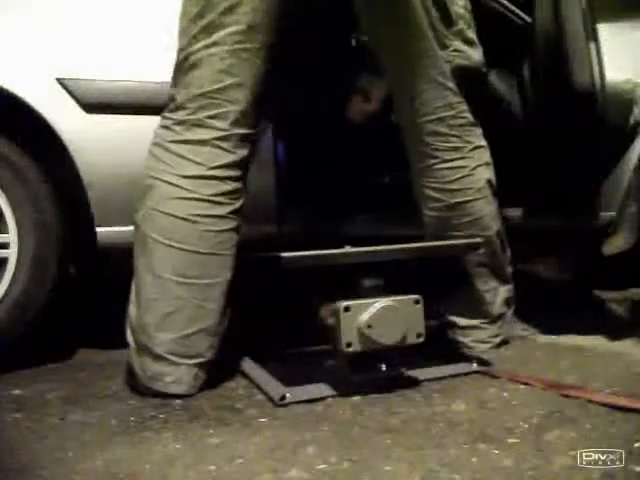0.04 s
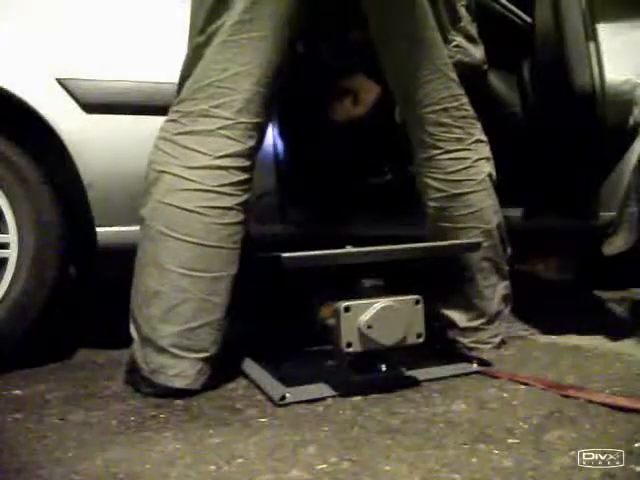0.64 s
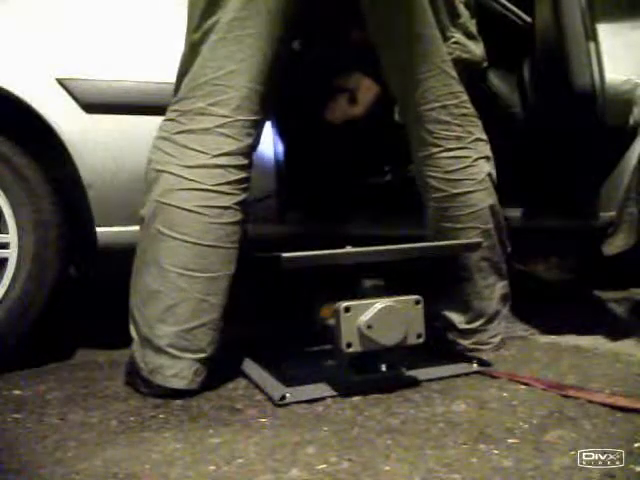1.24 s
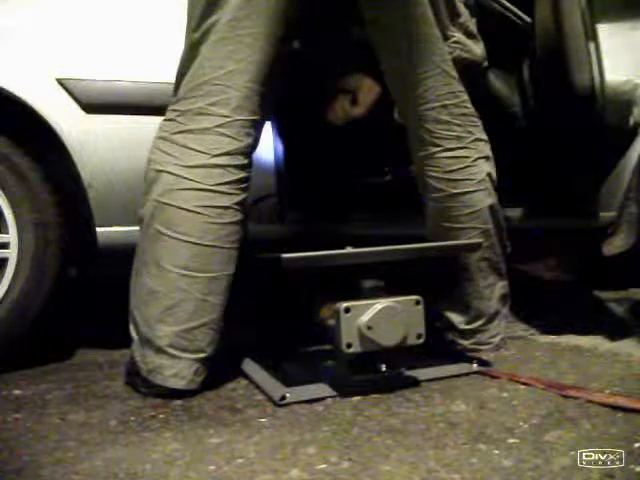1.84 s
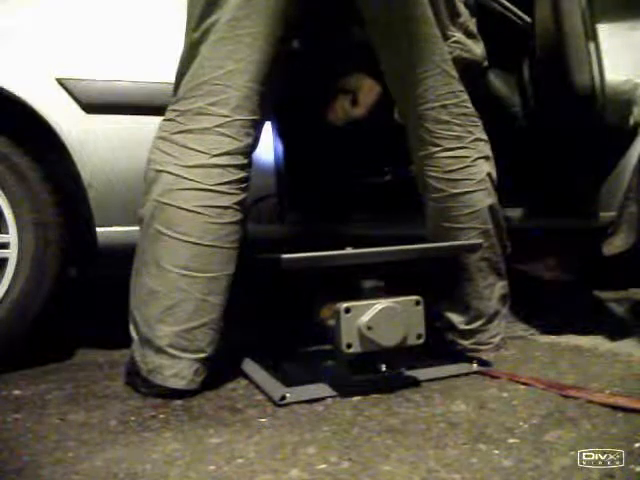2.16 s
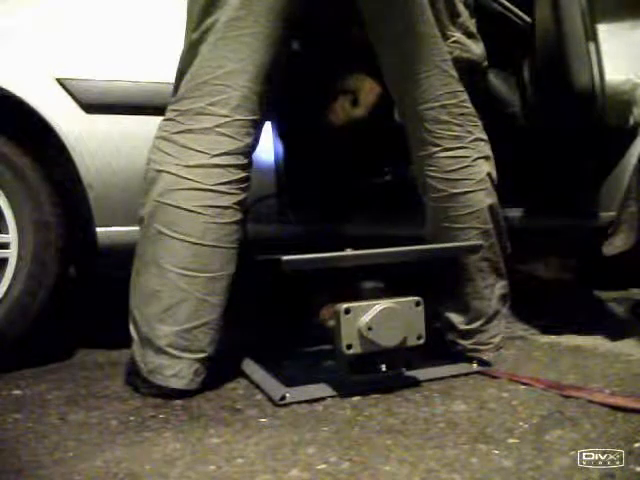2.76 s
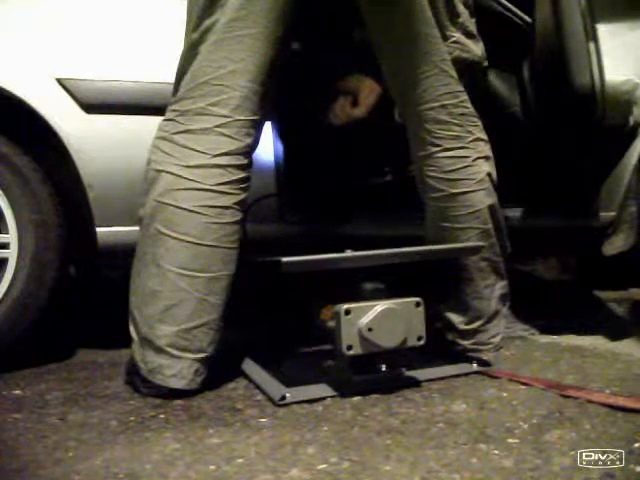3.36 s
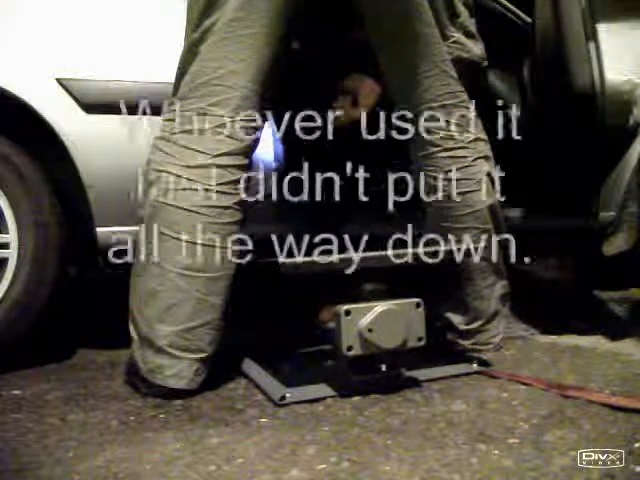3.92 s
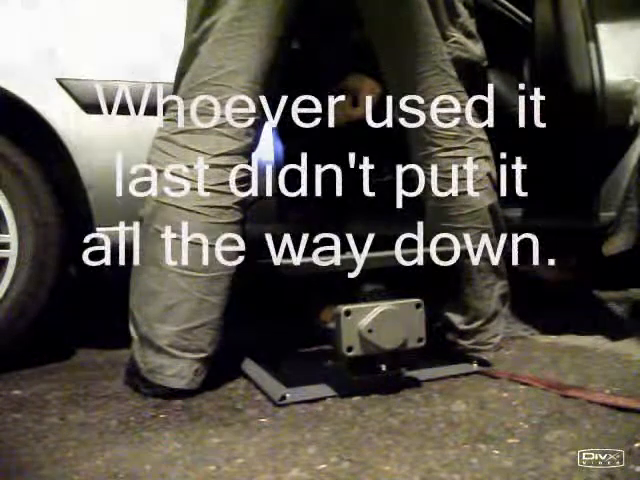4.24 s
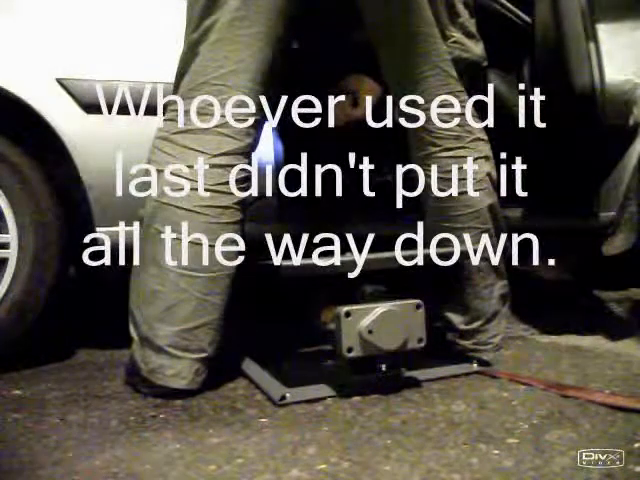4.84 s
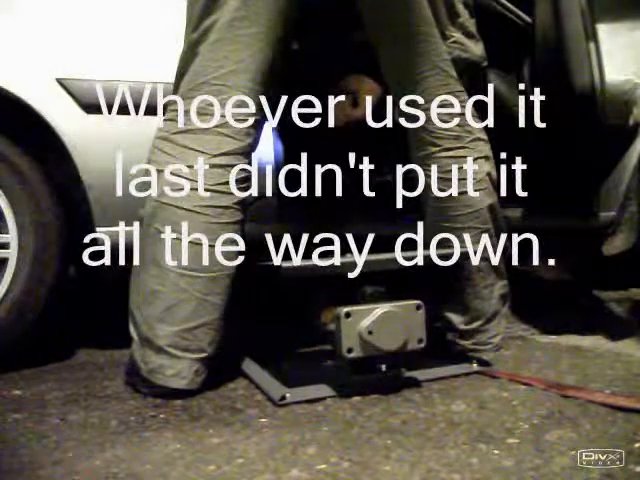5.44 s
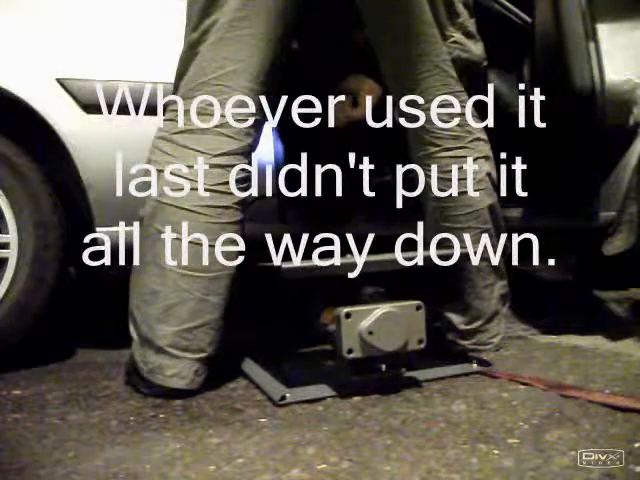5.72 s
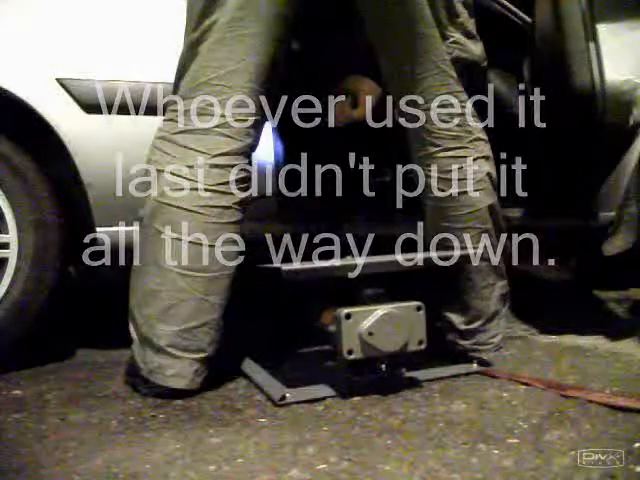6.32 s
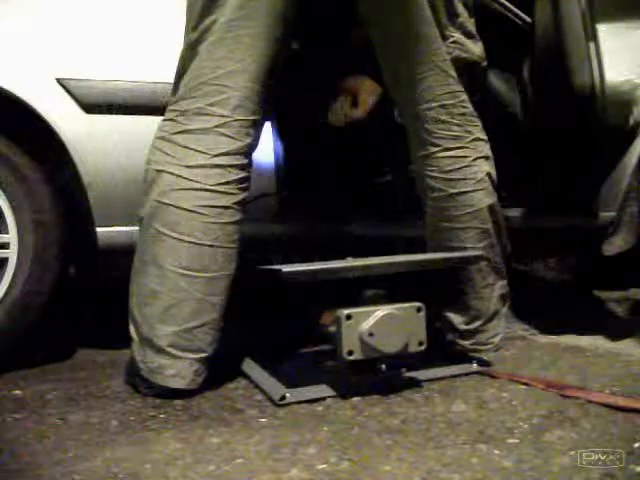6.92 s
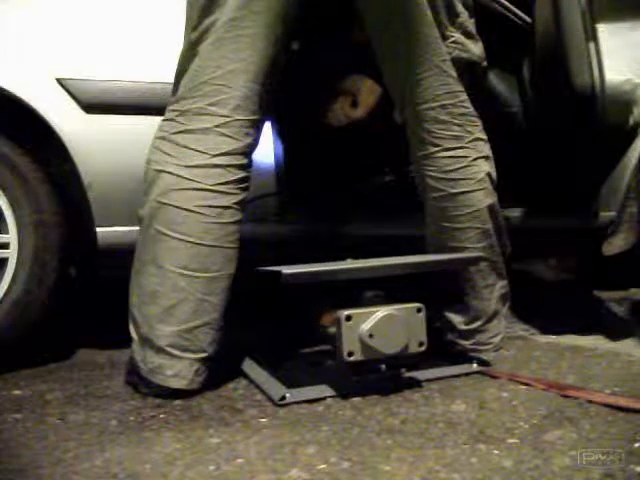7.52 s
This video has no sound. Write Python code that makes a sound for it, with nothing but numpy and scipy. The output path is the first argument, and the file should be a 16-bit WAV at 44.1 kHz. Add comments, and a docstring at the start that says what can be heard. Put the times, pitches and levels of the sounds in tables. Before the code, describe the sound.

An electric car jack is switched on in four quick bursts, its switch snapping and its motor spinning up and coasting down. Loose gears clack sharply as it starts a fifth time, then it runs steadily with a thin whine and a ringing, throbbing metal chatter. It is outdoors beside a car, with soft hiss and a far rumble. A small camera microphone nearby adds a bright fizz.

```python
"""An electric car jack is switched on in four short bursts, then left running beside a car.
Its switch snaps and its motor spins up and whines. Its loose gears clack, then chatter in a ringing
metal housing and throb as the wheels and the lifting screw turn, over a soft hiss and a far rumble.
A small camera samples the sound coarsely, which mirrors the chatter into a bright fizz."""
import sys
import numpy as np
from scipy.fft import rfft, irfft, next_fast_len
from scipy.io import wavfile
from scipy.ndimage import map_coordinates

SR = 44100
rng = np.random.default_rng(int(sys.argv[2]) if len(sys.argv) > 2 else 0)


def transcribe(u):
    """Save the signal u as a 16-bit wav file named by the first command-line argument.

    u: samples, shape (n,) or (channels, n), limited to [-1, 1]; the rate is SR.
    q: integer samples, one column per channel.
    """
    v = np.clip(np.atleast_2d(u).T, -1, 1)
    q = np.round(v * 32767).astype(np.int16)
    wavfile.write(sys.argv[1], SR, q)


N = 334278
TIME = np.arange(N) / SR

# each run of the motor: (switch on [s], switch off [s], relative rattle level [dB])
RUNS = [(-.07, .068, -.5), (.44, .596, .5), (.7164, .858, .5), (1.0266, 1.163, -.6), (1.3663, 9.1, 0)]


def amp(db):
    """Turn decibels into a gain."""
    return 10 ** (np.asarray(db) / 20)


def unit(x):
    """Scale a signal to an average (rms) level of 1."""
    return x / np.sqrt(np.mean(x ** 2) + 1e-20)


def along(points, hz):
    """Read between (frequency, value) points on a logarithmic frequency axis."""
    freqs, values = np.transpose(points)
    return np.interp(np.log(hz + 1), np.log(freqs + 1), values)


def wobble(rate):
    """A smooth random curve with `rate` new values a second."""
    return map_coordinates(rng.standard_normal(int(N * rate / SR) + 4), [TIME * rate])


def coloured(x, gain):
    """Filter x by gain(hz), so that any ringing comes after the blow that causes it."""
    size = 2 * next_fast_len(N // 2 + 8192)
    hz = np.fft.rfftfreq(size, 1 / SR)
    cepstrum = irfft(np.log(np.maximum(gain(hz), 1e-6)), size)
    cepstrum[1:size // 2] *= 2  # move the early half of the response onto the late half
    cepstrum[size // 2 + 1:] = 0
    return irfft(rfft(x, size) * np.exp(rfft(cepstrum)), size)[:N]


def below(x, edge_hz):
    """Keep only the frequencies under edge_hz."""
    size = next_fast_len(N + 8192)
    return irfft(rfft(x, size) * (np.fft.rfftfreq(size, 1 / SR) < edge_hz), size)[:N]


def background(hiss_db=-33.5, rumble_db=-46.7, drone_db=-54):
    """A soft outdoor hiss over a distant rumble and drone that swell now and then."""
    # the tone colour of each noise: (frequency [Hz], relative level [dB])
    hiss_colour = [(150, -14), (300, -12.5), (550, -19), (1000, -18), (1400, -17), (1750, -12), (2000, -13),
                   (2250, -4.5), (2400, -10), (2600, 1), (2900, -11.5), (3300, -18), (4000, -20.5),
                   (5400, -24)]
    rumble_colour = [(8, -24), (20, 2), (40, 3.5), (70, 0), (100, -5.5), (200, -16), (400, -20), (900, -62)]
    drone_colour = [(30, -30), (55, -9), (76, 0), (100, -12), (200, -40), (500, -80)]
    # swells of the distant noise: (time [s], half length [s], rumble rise [dB], drone rise [dB])
    swells = [(4.27, .1, 5, 3), (5.75, .15, 0, 4), (6.25, .13, 0, 11), (6.85, .25, 0, 4.5)]
    noise = lambda colour: unit(coloured(rng.standard_normal(N), lambda hz: amp(along(colour, hz))))
    hump = lambda s, half_s: np.exp(-((TIME - s) / half_s) ** 2)
    rumble_rise, drone_rise = sum(np.outer(rises, hump(s, half_s)) for s, half_s, *rises in swells)
    drone = amp(drone_db + drone_rise) * noise(drone_colour)
    hiss = amp(hiss_db) * noise(hiss_colour)
    rumble = amp(rumble_db + rumble_rise) * noise(rumble_colour)
    return hiss + rumble + drone


def housing(hz):
    """How strongly the metal housing rings at each frequency: narrow peaks on a broad hump."""
    # the housing's broad tone colour: (frequency [Hz], gain [dB])
    hump = [(150, -39), (400, -22), (600, -22.5), (800, -23.5), (1100, -13), (1400, -14.5), (1900, -12),
            (2300, -0.5), (2800, 2.5), (3300, -3), (3800, -11.5), (4400, -14.5), (4900, -21), (5500, -22.5)]
    # its ringing notes: (frequency [Hz], width [Hz], height above the hump [dB])
    notes = [(489, 19, 7.8), (673, 68, 7.6), (896, 85, 8.8), (984, 95, 9.9), (1484, 66, 6.6),
             (1589, 110, 7.7), (1799, 38, 6.9), (1872, 21, 5.7), (2029, 68, 7.6), (2273, 23, 2.9),
             (2422, 100, 2.3), (2539, 73, 6.0), (2762, 44, 2.9), (3048, 113, 8.5), (3579, 28, 4.8),
             (3659, 51, 3.3), (4555, 88, 4.4)]
    peaks = sum(db / (1 + (2 * (hz - centre) / width) ** 2) for centre, width, db in notes)
    return amp(along(hump, hz) + peaks)


def clacks(hits, level_db, fade_s, rattle_db, ring):
    """Metal hits metal: a sharp blow and a short rattle. `ring` sets how much the housing colours it."""
    t = np.arange(SR // 10) / SR
    blows = np.zeros(N + len(t))
    for s, db in hits:
        blow = (t == 0) + amp(rattle_db - 60 * t / fade_s) * rng.standard_normal(len(t))
        blows[round(s * SR):][:len(t)] += amp(db + level_db) * blow
    colour = lambda hz: housing(hz) ** ring * hz / (hz + 1500) / (1 + (hz / 6000) ** 8)
    peak = np.abs(coloured(TIME == 0, colour)).max()
    return coloured(blows[:N], colour) / peak


def contacts(snap_db=-8):
    """The switch contacts snap shut as a run starts."""
    snaps = [(on, snap_db) for on, _, _ in RUNS if on > 0]
    return clacks(snaps, level_db=0, fade_s=.025, rattle_db=-22, ring=.8)


def metal_knocks():
    """Sharp metal clacks: loose gear teeth, and one second snap of the switch just after it closes."""
    # sharp metal clacks: (time [s], relative level [dB])
    knocks = [(0.0847, -4), (0.5554, -2), (0.7267, -9), (0.7744, -5), (1.413, -1), (1.471, -8),
              (1.512, 4.5), (1.606, -5), (1.6474, -5), (1.7, -7)]
    return clacks(knocks, level_db=-2.5, fade_s=.035, rattle_db=-20, ring=1)


def since(s):
    """Seconds gone by since a moment, zero before it."""
    return np.maximum(TIME - s, 0)


def run_up(on, off, rise_s=.085):
    """The share of full speed that the motor gains while the switch is on."""
    return 1 - np.exp(-np.clip(TIME - on, 0, off - on) / rise_s)


def shaft(coast_s=.11, unsteady=.0008):
    """The motor speeds up and coasts down. Gives its speed (0 to 1) and its count of turns."""
    # the motor's top speed under load: (time [s], turning rate [Hz])
    load = [(1.9, 243.4), (2.6, 245.1), (3.7, 244), (4.2, 244.8), (4.8, 243.6), (5.7, 244.7), (6.4, 243),
            (7.3, 244.1)]
    top_hz = np.interp(TIME, *np.transpose(load))
    speed = np.max([run_up(on, off) * np.exp(-since(off) / coast_s) for on, off, _ in RUNS], axis=0)
    turns = np.cumsum(speed * top_hz * (1 + unsteady * wobble(12))) / SR
    return speed, turns


def motor(speed, turns, flutter_db=1):
    """The shaft and fan whine, standing out only near full speed."""
    # the motor's tones: (pitch [cycles per turn], level at full speed [dB])
    whine = [(1, -47.3), (2, -58), (18, -46)]
    tones = sum(amp(db + flutter_db * wobble(4.4)) * np.sin(2 * np.pi * cycles * turns)
                for cycles, db in whine)
    return np.sqrt(2) * speed ** 8 * tones


def pinion(speed, turns, flutter_db=2, slop_cycles=.028):
    """The small driving gear hums, swelling as its tones slide through the housing's ringing notes."""
    # tones of the meshing teeth: (pitch [cycles per turn], relative level [dB])
    mesh = [(4, -17), (5, -4.5)]
    tones = 0
    for cycles, db in mesh:
        level = amp(db + flutter_db * wobble(25))
        tones += level * np.sin(2 * np.pi * (cycles * turns + slop_cycles * wobble(50)))
    strain_db = 6.3 * np.tanh(8 * (1 - speed))  # a boost below top speed, where the motor strains
    strongest = housing(np.linspace(800, 1300, 100)).max()
    return np.sqrt(2) * coloured(tones * speed ** 2 * amp(strain_db), housing) / strongest


def teeth(turns, count=5, scatter=.3):
    """Each tooth of the driving gear lands a bit early or late with its own force, and scrapes."""
    slots = np.arange(int(turns[-1] * count))
    # the force can be plus or minus: loose teeth hit on either side
    late, force = rng.uniform(-1.086, 1, (len(slots), 2)).T
    when = np.interp((slots + scatter * late) / count, turns, np.arange(N)).astype(int)
    blows = unit(np.bincount(when, force, N))
    scrape = rng.standard_normal(N)
    return blows + scrape


def rattle(grows, fade_s, fade_shape):
    """How hard the gears rattle: growing with speed, dying ever faster once the power is cut."""
    runs = [amp(db) * run_up(on, off) ** grows * np.exp(-(since(off) / fade_s) ** fade_shape)
            for on, off, db in RUNS]
    return np.max(runs, axis=0)


def gears(speed, turns, case_db=-11.25, frame_db=-25.25, screw_turn_s=1.506, tight_at_s=1.89):
    """Tooth blows ring the gear case (high) and the jack's frame (low), throbbing with the wheels."""
    # uneven wheels press the teeth as they go round: (rate [cycles per motor turn], depth [dB])
    wheels = [(.0494, .75), (.0988, .95), (.1385, .75), (.405, .5), (2.068, .5)]
    # the lifting screw gets tight once a turn, and the case rattles harder
    tight_db = .64 * np.cos(2 * np.pi * (TIME - tight_at_s) / screw_turn_s)
    slow_db = -3 * (1 - speed ** 36)  # the case chatters fully only near top speed
    case_level = amp(case_db + tight_db + slow_db) * rattle(grows=.45, fade_s=.044, fade_shape=1.18)
    frame_level = amp(frame_db) * rattle(grows=.73, fade_s=.059, fade_shape=1.45)
    throb_db = sum(db * np.sin(2 * np.pi * (rate * turns + rng.random())) for rate, db in wheels)
    ringing = coloured(teeth(turns) * amp(throb_db), housing)
    frame = below(ringing, edge_hz=1720)
    case = ringing - frame
    return case_level * unit(case) + frame_level * (unit(frame) + pinion(speed, turns))


def scene():
    """The jack runs outdoors; one shaft drives both the whine and the gear chatter."""
    speed, turns = shaft()
    jack = contacts() + metal_knocks() + motor(speed, turns) + gears(speed, turns)
    return (jack + background())[None]


def record(dry, hold=4, top_hz=15750):
    """The camera caps the peaks and holds every fourth sample: the steps mirror the sound up high."""
    coarse = below(dry[0], SR / hold / 2)[::hold]
    steps = np.repeat(np.clip(coarse, -1, 1), hold)[:N]
    return below(steps, top_hz)[None]


dry = scene()
out = record(dry)
transcribe(out)
```